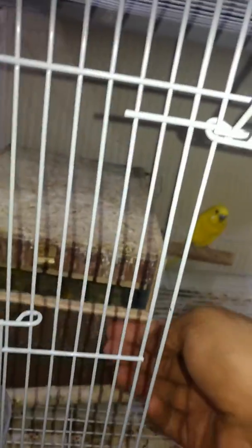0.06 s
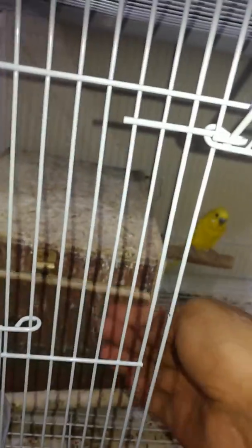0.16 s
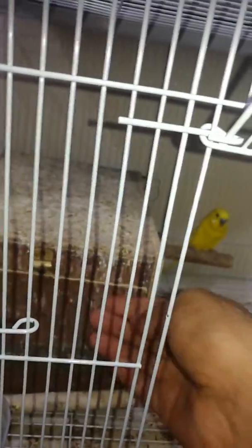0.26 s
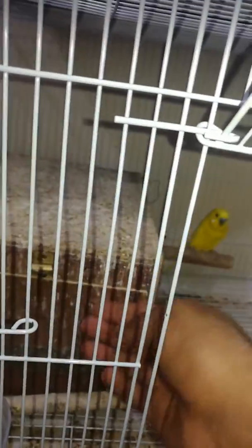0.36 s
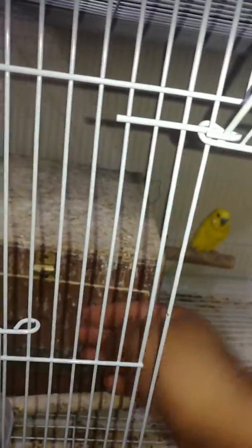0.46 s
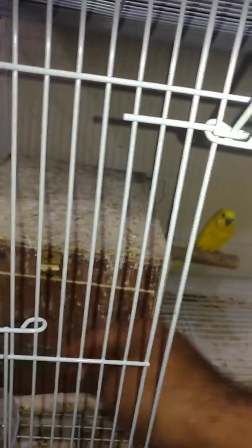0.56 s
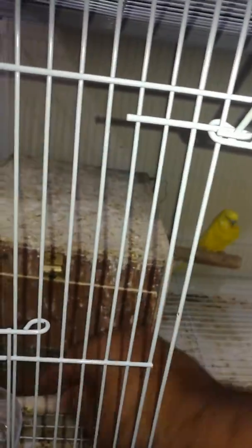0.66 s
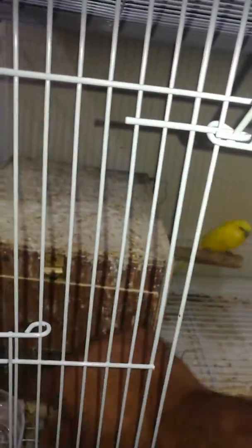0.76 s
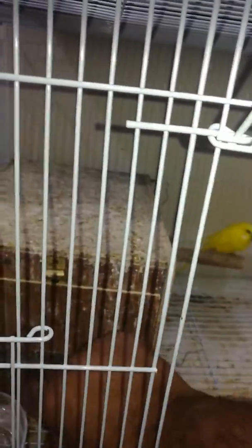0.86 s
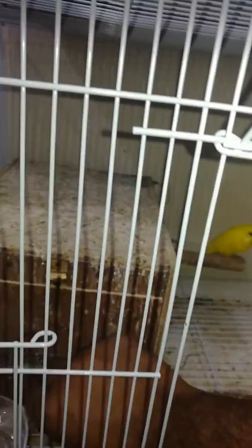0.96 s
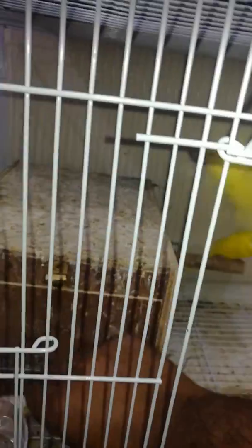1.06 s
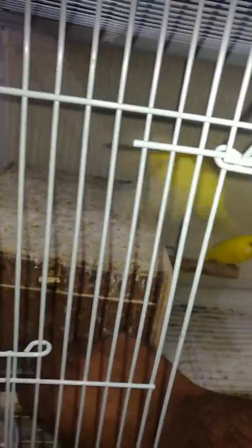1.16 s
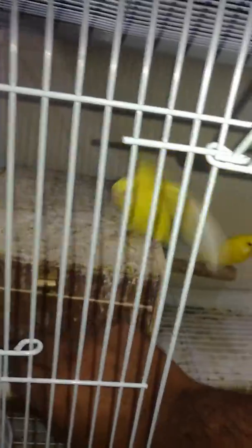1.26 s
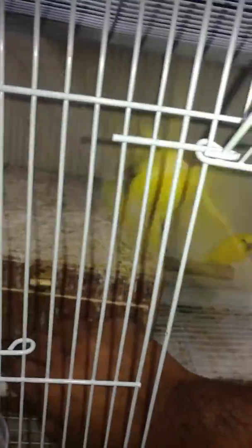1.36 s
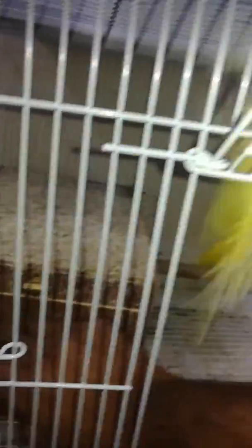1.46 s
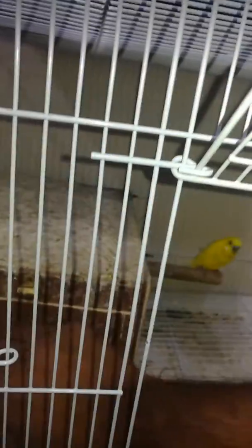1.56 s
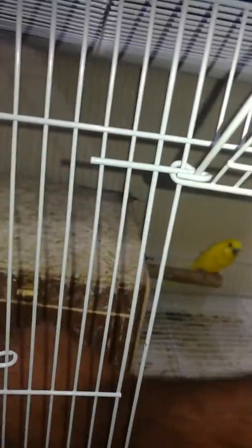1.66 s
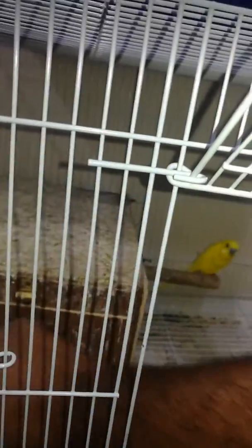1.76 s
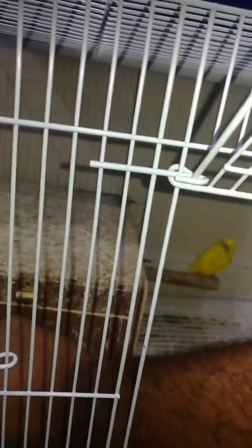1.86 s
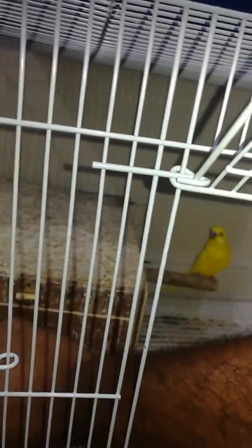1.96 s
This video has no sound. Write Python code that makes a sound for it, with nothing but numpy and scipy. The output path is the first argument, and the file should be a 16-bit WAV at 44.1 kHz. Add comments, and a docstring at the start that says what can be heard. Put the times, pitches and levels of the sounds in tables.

```python
"""Small bare-walled room, budgerigars in a wire cage, a hand-held phone close by. Fingers rub and bump the
phone (gliding hums, struck body modes); birds chirp (gliding sines with overtones) and claws tick (noise bursts).
Feathers rustle and one bird takes off in a burst of wing claps (shaped grainy noise) amid low buffeting and
air puffs. Feather and claw sounds ring the cage wires faintly; noise-built responses give the room's answer."""
import sys
import numpy as np
from scipy import signal
from scipy.fft import rfft, irfft
from scipy.io import wavfile
from scipy.ndimage import uniform_filter1d

SR = 44100
rng = np.random.default_rng(int(sys.argv[2]) if len(sys.argv) > 2 else 0)


def inscribe(sig):
    """Save sig as 16-bit PCM at rate SR to the path in sys.argv[1].

    A 1-D sig is mono; a 2-D sig holds one channel per row.
    Samples are clipped to [-1, 1] before scaling.
    """
    pcm = np.round(np.clip(np.atleast_2d(sig).T, -1, 1) * 32767)
    wavfile.write(sys.argv[1], SR, pcm.astype(np.int16))


N = 88200


def undb(db):
    """Decibels to amplitude gain."""
    return 10 ** (np.asarray(db) / 20)


def clock():
    """Time of every sample in s."""
    return np.arange(N) / SR


def curve(rows):
    """Gain through (time_s, level_db) points, linear in dB."""
    time_s, level_db = np.array(rows).T
    return undb(np.interp(clock(), time_s, level_db))


def colour(x, points):
    """Minimum-phase filter through (freq_hz, gain_db) points; keeps the power of white noise."""
    freq_hz, gain_db = np.array(points).T
    size = 2 * N
    log_hz = np.log(np.arange(N + 1) * SR / size + 1)
    gain = undb(np.interp(log_hz, np.log(freq_hz), gain_db))
    cepstrum = irfft(np.log(gain / np.sqrt(np.mean(gain ** 2))))
    # folding the cepstrum makes the filter causal
    cepstrum[1:N] *= 2
    cepstrum[N + 1:] = 0
    return irfft(rfft(x, size) * np.exp(rfft(cepstrum)))[..., :N]


def lowpass(x, hz):
    """First-order low-pass."""
    return signal.sosfilt(signal.butter(1, min(hz, SR / 2 - 1), fs=SR, output="sos"), x)


def walk(hz):
    """Smooth random wander below hz, standard deviation 1."""
    wander = signal.sosfilt(signal.butter(2, hz, fs=SR, output="sos"), rng.standard_normal(N))
    return wander / wander.std()


def crackle(grain, grain_hz):
    """Noise in tiny uneven grains, rms 1."""
    x = rng.standard_normal(N) * np.exp(grain * np.clip(walk(grain_hz), -2, 2))
    return x / x.std()


def fade(start_s, decay_s):
    """Sudden onset, exponential decay."""
    age_s = clock() - start_s
    return (age_s >= 0) * np.exp(-np.abs(age_s) / decay_s)


def ring(modes, scatter_cycles=0):
    """Impulse response of damped modes (freq_hz, level_db, t60_s), phases optionally scattered."""
    t, out = clock(), np.zeros(N)
    for freq_hz, level_db, t60_s in modes:
        cycles = freq_hz * t + scatter_cycles * rng.random()
        out += undb(level_db - 60 * t / t60_s) * np.sin(2 * np.pi * cycles)
    return out


def convolve(x, response):
    """Passes a sound through an impulse response."""
    return signal.fftconvolve(x, response)[:N]


# room tone spectrum: freq_hz, gain_db
FLOOR_COLOUR = [(25, -7), (150, -7.5), (450, -21), (800, 14), (1300, -14.5), (2300, -9.5), (4000, -8.5),
                (8000, -33), (16000, -16)]
FLOOR_DB = -79


def room_tone():
    """Steady coloured noise: a part shared by both ports plus a weaker part private to each."""
    noise = rng.standard_normal(N) + 0.31 * rng.standard_normal((2, N))
    return undb(FLOOR_DB) * colour(noise, FLOOR_COLOUR)


# chirp notes: start_s, length_s, start_hz, end_hz, level_db, roughness (0-1), overtone_db
CHIRPS = [(-.015, 0.041, 2900, 2547, -45, 0.7, -23.5), (-.01, 0.059, 2195, 2226, -41.5, 0.41, -16),
          (0.614, 0.035, 3250, 3300, -49.5, 0.52, -20), (0.676, 0.015, 2480, 2556, -36, .05, -18.5),
          (0.802, .022, 1420, 1250, -46.5, .3, -34), (1.05, 0.011, 2650, 2670, -35.5, 0, -22),
          (1.066, 0.015, 2500, 2375, -29, 0.2, -44), (1.079, 0.011, 3300, 2970, -47.5, 0.28, -8),
          (1.107, 0.0155, 2805, 2210, -32.5, 0.42, -26.5), (1.121, 0.01, 2850, 2440, -38, 0.6, -23.5),
          (1.131, 0.011, 1860, 2010, -25.5, .05, -43), (1.139, 0.025, 1800, 1595, -32, 0.32, -37),
          (1.209, 0.0123, 2550, 2230, -33.5, .1, -23), (1.894, 0.033, 2500, 2660, -41, 0.31, -9.5),
          (1.915, 0.05, 3050, 3000, -50.5, 0.7, -4.5), (1.938, 0.024, 2450, 2250, -39, 0.26, -14.5)]
RASP_HZ, RASP_SWING_HZ = 193.2, 389


def chirps():
    """Short gliding whistles with overtones; fast flutter of pitch and level makes them raspy."""
    t, out = clock(), np.zeros(N)
    rasp_cycles = np.cumsum(RASP_HZ * (1 + 0.2 * walk(hz=77.4))) / SR
    flutter = np.sin(2 * np.pi * rasp_cycles) + 0.699 * walk(hz=503)
    for start_s, length_s, start_hz, end_hz, level_db, roughness, overtone_db in CHIRPS:
        u = np.clip((t - start_s) / length_s, 0, 1)
        pitch_hz = start_hz + (end_hz - start_hz) * u + roughness * RASP_SWING_HZ * flutter
        phase = 2 * np.pi * np.cumsum(pitch_hz) / SR
        overtone = undb(overtone_db)
        upper = 0.4 * overtone ** 2 * (np.sin(3 * phase) + 0.5 * np.sin(4 * phase))
        tone = np.sin(phase) + overtone * np.sin(2 * phase) + upper
        envelope = np.sin(np.pi * u) * (1 + 0.5 * roughness * flutter)
        out += undb(level_db) * envelope * tone
    return out


# feather rustle level: time_s, level_db
RUSTLE_LEVEL = [(.50, -67), (.53, -56), (.63, -53), (.76, -58), (.88, -63), (.94, -48), (1.04, -50.5),
                (1.18, -52.5), (1.29, -41), (1.35, -48), (1.42, -39.5), (1.50, -65), (1.58, -45.5),
                (1.72, -50), (1.78, -48.5), (1.83, -50.5), (2, -59)]
# feather rustle spectrum: freq_hz, gain_db
RUSTLE_COLOUR = [(40, 8), (150, -20.5), (300, 0), (420, -7.5), (550, -4.5), (820, 6), (1100, -1.5),
                 (1800, -0.5), (2500, -6), (3100, -13), (6000, -14.5), (8000, -24), (16000, -27)]
RUSTLE_GRAIN, BEAT_HZ, BEAT_DEPTH = 0.68, 20, 0.43


def rustle():
    """Feathers brush each other and the bars: grainy noise throbbing at an uneven wing-beat rate."""
    beat_cycles = np.cumsum(BEAT_HZ * (1 + 0.12 * walk(hz=4.5))) / SR
    throb = 1 + BEAT_DEPTH * np.sin(2 * np.pi * beat_cycles)
    noise = crackle(RUSTLE_GRAIN, grain_hz=430) * throb
    return colour(noise, RUSTLE_COLOUR) * curve(RUSTLE_LEVEL)


# low buffeting level, from moving air and the arm in the cage: time_s, level_db
BUFFET_LEVEL = [(.49, -74), (.53, -61), (.57, -51.5), (.64, -56.5), (.76, -48), (.86, -54.5), (.95, -40.5),
                (1.04, -42.5), (1.13, -53.5), (1.24, -55.5), (1.31, -38.5), (1.42, -40), (1.53, -39.5),
                (1.62, -42), (1.75, -50.5), (1.83, -65.5), (2, -72)]
# buffeting spectrum: freq_hz, gain_db
BUFFET_COLOUR = [(15, 1.5), (40, -5), (65, 8), (95, -0.5), (135, 1), (200, -6.5), (320, -25), (600, -17),
                 (2000, -86)]
# air puffs on the microphone: centre_s, peak_db, half_width_s
PUFFS = [(.707, -41, .004), (0.764, -35.5, 0.0022), (1.329, -27, 0.0035), (1.38, -22, .0026)]


def air():
    """Low buffeting noise, levelled then shaped, and single puffs that suck and then push."""
    rumble = colour(rng.standard_normal(N), BUFFET_COLOUR)
    running_rms = np.sqrt(uniform_filter1d(rumble ** 2, size=3000))
    out = rumble / running_rms * curve(BUFFET_LEVEL)
    for centre_s, peak_db, half_width_s in PUFFS:
        u = (clock() - centre_s) / half_width_s
        out += undb(peak_db) * u * np.exp((1 - u ** 2) / 2)
    return out


# finger drags on the phone's case: start_s, length_s, start_hz, end_hz, level_db
RUBS = [(0.123, 0.099, 215, 139, -45.5), (0.265, 0.082, 185, 139, -39.5), (0.353, 0.088, 165, 119, -48.5),
        (0.524, 0.015, 170, 131, -44.5)]
RUB_JITTER = 0.29


def rubs():
    """Skin sticks and slips on the case: a soft, unsteady, falling hum."""
    out, unsteady = np.zeros(N), 1 + RUB_JITTER * walk(hz=114)
    for start_s, length_s, start_hz, end_hz, level_db in RUBS:
        u = np.clip((clock() - start_s) / length_s, 0, 1)
        pitch_hz = (start_hz + (end_hz - start_hz) * u) * unsteady
        phase = 2 * np.pi * np.cumsum(pitch_hz) / SR
        out += undb(level_db) * np.sin(np.pi * u ** 0.47) * np.sin(phase)
    return out


# bumps on the phone's body: start_s, level_db, contact_s
BUMPS = [(.2135, -18.5, 0.00065), (0.228, -38.5, 0.0024)]
# phone body modes: freq_hz, level_db, t60_s
BODY_MODES = [(138, -1, .1), (185, 0, .08), (404, -11, .05), (700, -10, .03), (829, -4, .055),
              (937, -13, .04), (1300, -12, .04)]
# case rattle spectrum: freq_hz, gain_db
RATTLE_COLOUR = [(100, -30), (300, 9.5), (550, 3.5), (850, 14.5), (1300, -3.5), (1800, -11.5), (3000, -37),
                 (16000, -45.5)]
BUMP_LOW_CUT_HZ, RATTLE_DB, RATTLE_DECAY_S = 122, -37, 0.019


def bumps():
    """Dull knocks on body modes, longer contact favouring the low ones; the first rattles the case."""
    push = np.zeros(N)
    for start_s, level_db, contact_s in BUMPS:
        # keeps the drive of the first mode independent of contact time
        makeup = np.hypot(1, 2 * np.pi * BODY_MODES[0][0] * contact_s)
        push += undb(level_db) * fade(start_s, contact_s) / (contact_s * SR) * makeup
    rattle_noise = rng.standard_normal(N) * fade(BUMPS[0][0], RATTLE_DECAY_S)
    rattle = undb(RATTLE_DB) * colour(rattle_noise, RATTLE_COLOUR)
    low_cut = signal.butter(4, BUMP_LOW_CUT_HZ, "high", fs=SR, output="sos")
    return signal.sosfilt(low_cut, convolve(push, ring(BODY_MODES)) + rattle)


# claws and beaks on wire and perch: start_s, level_db, decay_s, treble_db
TICKS = [(0.362, -42, 0.0086, -14), (0.516, -54, 0.0097, -27), (0.564, -56, 0.015, 3.5),
         (0.608, -46, 0.0026, 12.5), (.752, -49.5, 0.0045, 5), (0.9179, -36, 0.0063, 3.5),
         (0.9699, -35, 0.0061, -6), (1, -53, 0.018, -13), (1.225, -36.5, 0.0036, -27),
         (1.277, -33.5, 0.0031, 6), (1.689, -31, 0.0022, -1), (1.7424, -26, 0.0011, 10),
         (1.7432, -24.5, 0.0027, -2), (1.888, -35.5, 0.0031, -31)]
# tick spectrum: freq_hz, gain_db
TICK_COLOUR = [(150, -15), (500, 5), (900, -6.5), (2300, 6), (4000, -4.5), (6200, -5), (8000, -17),
               (16000, -15.5)]


def claws():
    """Short scratchy contacts with wire and perch: decaying bursts of grainy noise."""
    noise = colour(crackle(grain=1.0, grain_hz=1850), TICK_COLOUR)
    body = lowpass(noise, hz=3000)
    treble = noise - body
    out = np.zeros(N)
    for start_s, level_db, decay_s, treble_db in TICKS:
        out += undb(level_db) * fade(start_s, decay_s) * (body + undb(treble_db) * treble)
    return out


# wing strokes: clap_s, level_db, swish_rise_s, treble_db, bass_db
STROKES = [(1.277, -41, 0.004, -7, -19), (1.295, -36, 0.0024, -12, 8), (1.322, -44.5, 0.0044, 4.5, 11),
           (1.378, -31, .004, 4, 12), (1.406, -39.5, 0.0008, 7.5, -20), (1.4263, -22.5, 0.0038, 1, 1.5),
           (1.441, -43, 0.0024, -1, 4), (1.466, -43, .002, 12, -11), (1.4797, -17.5, 0.0034, -9, -9),
           (1.516, -29, 0.00067, -1, 4.5), (1.5285, -24, 0.0017, -7, -35), (1.638, -36, .005, -2, 2.5)]
# wing noise spectrum: freq_hz, gain_db
WING_COLOUR = [(40, -45), (120, -7), (250, 4.5), (440, -5), (560, 2.5), (760, 6.5), (1050, -3.5),
               (1800, 4.5), (3000, -7), (5800, -6.5), (8000, -14.5), (11000, -11), (16000, -15)]
SWISH_FALL_S, CLAP_DECAY_S, CLAP_DB, FEATHER_GRAIN = 0.0036, 0.00028, 4.5, 0.52


def wings():
    """Each stroke swishes up to a short clap of the feathers, with its own bass and treble balance."""
    t, out = clock(), np.zeros(N)
    noise = colour(crackle(FEATHER_GRAIN, grain_hz=1500), WING_COLOUR)
    bass, body = lowpass(noise, hz=630), lowpass(noise, hz=2960)
    middle, treble = body - bass, noise - body
    for clap_s, level_db, swish_rise_s, treble_db, bass_db in STROKES:
        swish = np.exp(-np.abs(t - clap_s) / np.where(t < clap_s, swish_rise_s, SWISH_FALL_S))
        clap = undb(CLAP_DB) * fade(clap_s, CLAP_DECAY_S)
        balanced = undb(bass_db) * bass + middle + undb(treble_db) * treble
        out += undb(level_db) * (swish + clap) * balanced
    return out


PORT_LIKENESS = 0.51  # correlation between ports


def feathers():
    """Wings, claws and rustle at both ports; the birds move, so the two hear partly different detail."""
    right, other = (wings() + claws() + rustle() for _ in range(2))
    left = PORT_LIKENESS * right + np.sqrt(1 - PORT_LIKENESS ** 2) * other
    return np.array([left, right])


# cage wire modes: freq_hz, level_db, t60_s
WIRE_MODES = [(300, -1, .6), (335, -2, .6), (421, -2, .7), (465, -4, .5), (750, -4, .35), (822, -3.5, 1.1),
              (850, -4.5, 1.1), (1233, -8, .4), (1594, -9, .35), (1675, -9, .35), (1787, -8, .35),
              (2170, -9, .5), (2445, -8, .5), (3678, -12, .4)]
WIRE_DB = -63


def cage_wires(flutter):
    """Feather and claw sound drives damped wire modes, phases drawn anew for each port."""
    ringing = [convolve(x, ring(WIRE_MODES, scatter_cycles=0.93)) for x in flutter]
    return undb(WIRE_DB) * np.array(ringing)


# room decay: freq_hz, t60_s
ROOM_T60 = [(150, 0.2), (800, 0.23), (2500, 0.32), (6000, 0.19), (14000, 0.27)]
ROOM_DB, EARLY_DB, EARLY_DECAY_S = -9.5, -1, 0.0019


def room():
    """Response at one port: quick reflections from around the cage, then a tail decaying per band."""
    t = clock()
    freq_hz, t60_s = np.array(ROOM_T60).T
    spectrum = rfft(rng.standard_normal(N))
    log_hz = np.log(np.arange(N // 2 + 1) * SR / N + 1)
    tail = np.zeros(N)
    for band, band_t60_s in zip(np.eye(len(freq_hz)), t60_s):
        weight = np.interp(log_hz, np.log(freq_hz), band)
        tail += irfft(spectrum * weight, N) * np.exp(-np.log(1000) * t / band_t60_s)
    tail = tail * (1 - np.exp(-t / 0.013))  # gradual build-up
    early = crackle(grain=0.27, grain_hz=3240) * fade(0.00084, EARLY_DECAY_S)
    tail_part = undb(ROOM_DB) * tail / np.linalg.norm(tail)
    return tail_part + undb(EARLY_DB) * early / np.linalg.norm(early)


DIRECT_DB, EVEN_BELOW_HZ = -3, 556


def place(pair, pan_db, echo_pan_db, rooms):
    """Adds echoes; pans set left-over-right level, and the bass keeps its unpanned level."""
    direct = undb(DIRECT_DB) * pair
    echoes = np.array([convolve(x, response) for x, response in zip(pair, rooms)])
    sides = np.array([[1], [-1]]) / 2
    panned = direct * undb(pan_db * sides) + echoes * undb(echo_pan_db * sides)
    return panned + lowpass(direct + echoes - panned, hz=EVEN_BELOW_HZ)


WING_PAN_DB, CHIRP_PAN_DB, BUMP_WET_DB = 2.5, -4, -2
PORT_LAG_S = 0.000542


def scene():
    """Birds and air reach the left port a little later; handling reaches both ports at once."""
    rooms = [room(), room()]
    flutter, calls = feathers(), chirps()
    birds = place(flutter, WING_PAN_DB, echo_pan_db=-6, rooms=rooms)
    birds += place(np.array([calls, calls]), CHIRP_PAN_DB, echo_pan_db=-8, rooms=rooms)
    left, right = birds + air()
    late_left = np.interp(clock() - PORT_LAG_S, clock(), left)
    knocks = bumps()
    knock_treble = knocks - lowpass(knocks, hz=400)
    knock_echoes = np.array([convolve(knock_treble, response) for response in rooms])
    handling = knocks + rubs() + undb(BUMP_WET_DB) * knock_echoes
    return np.array([late_left, right]) + cage_wires(flutter) + handling + room_tone()


TOP_HZ = 16000


def record(dry):
    """The phone cuts the top: steep elliptic low-pass."""
    return signal.sosfilt(signal.ellip(10, 0.2, 80, TOP_HZ, fs=SR, output="sos"), dry)


dry = scene()
out = record(dry)
inscribe(out)
```